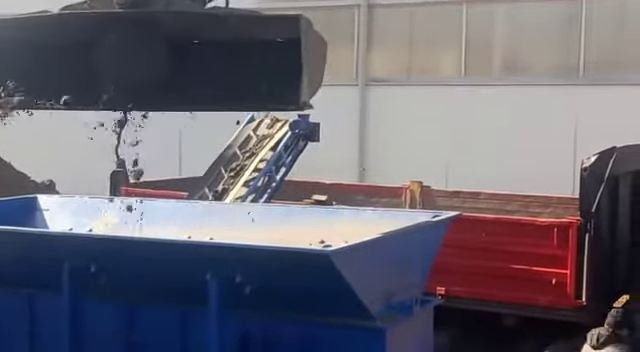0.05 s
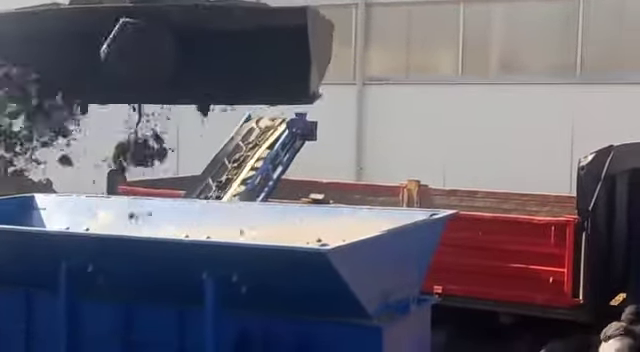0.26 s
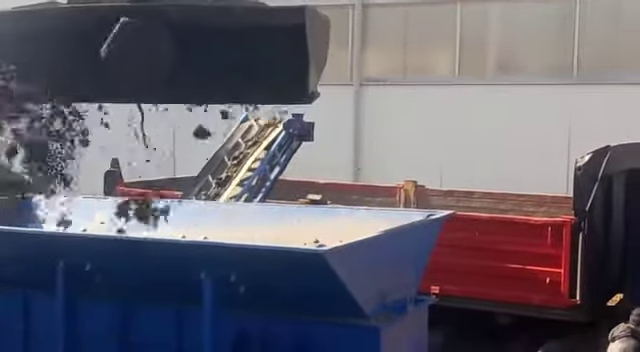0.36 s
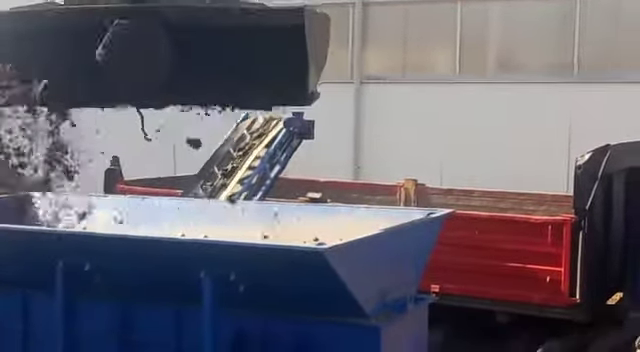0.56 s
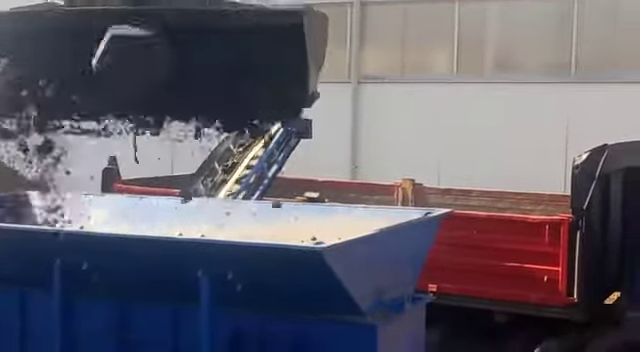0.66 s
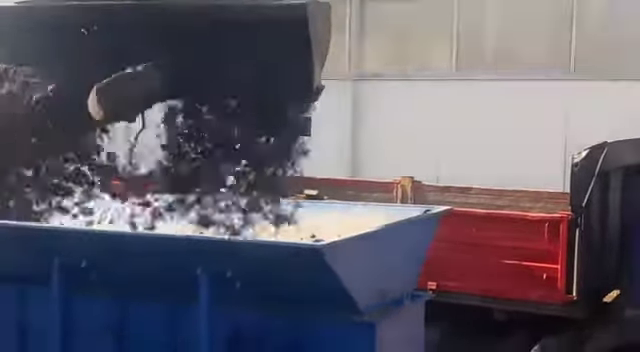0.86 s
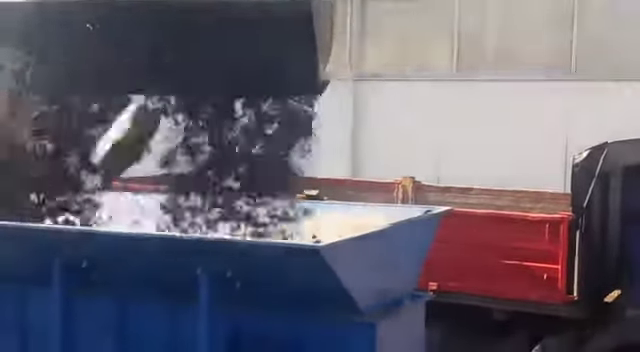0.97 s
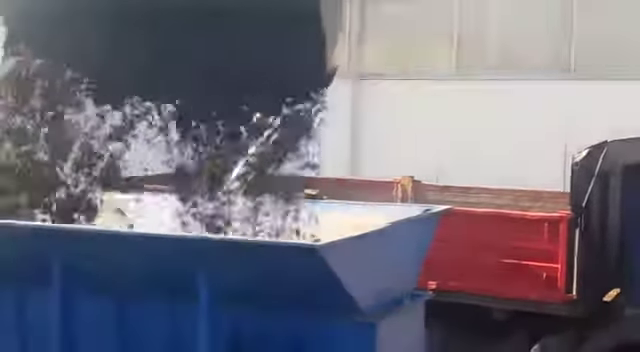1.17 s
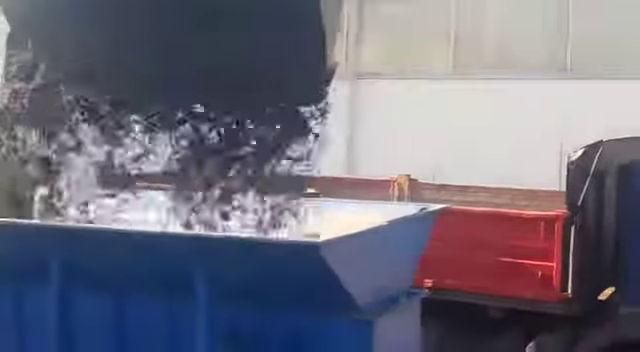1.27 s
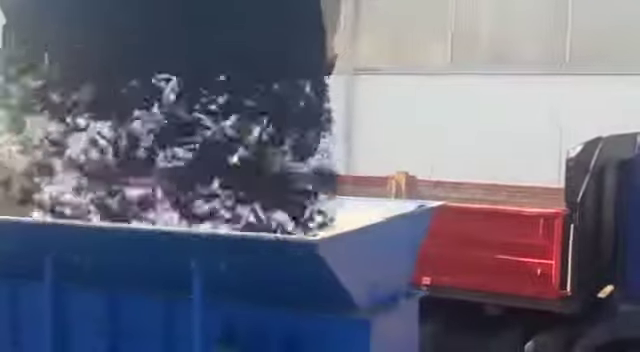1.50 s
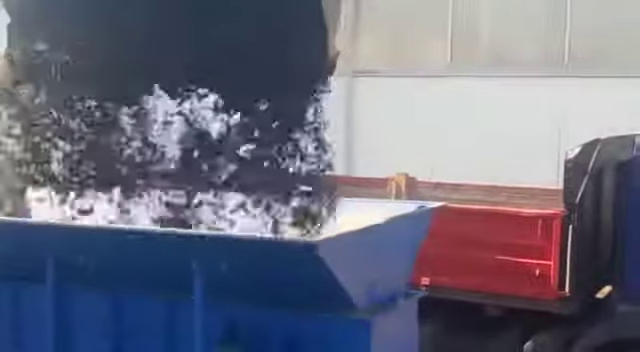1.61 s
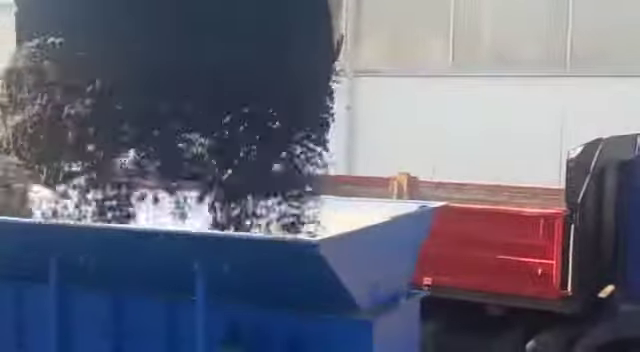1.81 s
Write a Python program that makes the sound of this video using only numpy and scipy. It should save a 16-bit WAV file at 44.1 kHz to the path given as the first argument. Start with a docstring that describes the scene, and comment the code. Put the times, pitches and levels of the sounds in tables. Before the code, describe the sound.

Rubble clatters into a metal hopper, then soil lands with a rumble as machines run.

```python
"""A work yard, one microphone near a steel hopper, a loader's diesel and other machines behind it.
The loader tips its bucket: first stones clank on the bare walls, with trickling soil and gravel.
From about 0.5 s clods burst into grit, and something heavy groans down a wall.
Around 1.2 s the bulk of the soil lands with a drumming rumble and smothers the ringing
left by grit and gravel. Fine soil slides after it, and the machines run on."""
import sys
import numpy as np
from scipy import signal
from scipy.fft import rfft, irfft, next_fast_len
from scipy.io import wavfile
from scipy.ndimage import uniform_filter1d, map_coordinates

SR = 44100
rng = np.random.default_rng(int(sys.argv[2]) if len(sys.argv) > 2 else 0)


def wrap_up_sound(samples):
    """Save the sound to the file named by the first command line argument, as 16-bit audio."""
    columns = np.atleast_2d(samples).T
    # keep every value between -1 and 1, then stretch to whole-number steps
    tamed = np.clip(columns, -1, 1)
    steps = np.round(tamed * 32767).astype(np.int16)
    wavfile.write(sys.argv[1], SR, steps)


N = 81585
GRAINS_PER_S = 3000


def stones():
    """Each stone gives a short clack and a bright edge, and the steel walls ring on."""
    # stones on steel: t/s, ring level/dB, clack level/dB, clack f/Hz, edge re ring/dB
    hits = [(.1995, -32, -18.5, 2530, -43), (0.205, -27, -8.5, 2060, -38), (0.4046, -26, -10.5, 2640, -25),
            (0.4576, -23.5, -10.5, 2020, -21.5), (0.464, -31.5, -12, 1890, -13),
            (0.501, -29.5, -22, 2360, -12), (.526, -27.5, -22, 1900, -31.5),
            (0.5981, -30, -17, 1650, -28.5), (0.6207, -25, -12.5, 2090, -32), (0.6481, -35, -17, 1940, -30),
            (0.7277, -28, -30, 2180, -15), (0.8035, -21, -14, 2510, -34.5), (0.8113, -28, -9.5, 2673, -9),
            (0.837, -43, -11, 1880, -9.5), (0.879, -25, -12, 2240, -23), (0.9004, -24.5, -11, 1990, -10.5),
            (0.916, -36.5, -14, 2495, -5), (0.9451, -24, -14, 2040, -16.5),
            (1.0444, -31.5, -15.5, 2034, -19), (1.0611, -25, -8.5, 2016, -21),
            (1.099, -29, -21, 1440, -31.5), (1.1491, -20, -3.5, 2614, 2.5), (1.2136, -34, -7, 2020, 4.5),
            (1.2558, -22.5, -10.5, 2570, -4), (1.388, -37, -23, 2060, -24), (1.446, -39, -31, 1530, -23),
            (1.495, -43, -31, 2280, -25), (1.527, -42.5, -23, 2700, -3)]
    # spectra of the dense ringing and of the hard contact: f/Hz, relative level/dB
    clang_spectrum = [(300, -37), (900, -12.5), (1200, -22.5), (1350, -9), (1530, -6.5), (1750, -3.5),
                      (1950, 8), (2150, -2.5), (2380, -9), (2660, 2.5), (3000, -11.5), (4200, -15),
                      (7000, -56.5)]
    edge_spectrum = [(1500, -30), (2800, 0.5), (4200, -11), (5700, -2.5), (6600, -11.5), (8000, -12)]
    out, t = np.zeros(N), clock()
    for start, db, clack_db, hz, edge_db in hits:
        ring = tinted(noise(clang_spectrum)) * fade(t, t60=0.15)
        add(ring, 0, amp(-3) * wall_modes())
        ring *= rise(t, tau=0.0028)
        edge = amp(edge_db) * tinted(noise(edge_spectrum)) * fade(t, t60=0.16) * rise(t, tau=0.0015)
        clack = np.sin(2 * np.pi * hz * t) * fade(t, t60=0.016) * rise(t, tau=0.0013)
        add(out, start, amp(db) * (ring + edge) + amp(clack_db) * clack)
    return out


def wall_modes():
    """The wall rings after one contact, struck a little differently each time."""
    # clearest modes of the steel: f/Hz, relative level/dB, t60/s
    modes = [(606, -23, 0.46), (770, -20.5, 0.12), (1051, -23, 0.11), (1322, -11, 0.18), (1568, -6.5, 0.2),
             (1633, -7, 0.067), (1987, -5.5, 0.034), (1950, -5.5, 0.25), (2063, -5, 0.078),
             (2120, -2, 0.19), (2680, -11, 0.18), (3130, -15.5, 0.23), (3550, -18.5, 0.15),
             (4196, -21.5, 0.087)]
    t = clock()[:SR // 2]
    return sum(amp(db + rng.normal(0, 0.36)) * fade(t, t60) * np.sin(2 * np.pi * (hz * t + rng.random()))
               for hz, db, t60 in modes)


def on_steel(contacts, ring_db):
    """Contacts with the ringing they leave in the walls, which the growing heap smothers."""
    # damping by the heap: t/s, gain/dB
    cover = [(1.25, 0.5), (1.45, -20.5)]
    ringing = unit(signal.fftconvolve(contacts, wall_modes())[:N])
    return unit(unit(contacts) + amp(ring_db) * level(cover) * ringing)


def soil():
    """Soft lumps drum the side panels, the bulk thuds on the bottom, fines hiss out after it."""
    # flow of lumps, bulk and fines: t/s, level/dB
    lump_flow = [(.36, -50.5), (.45, -40), (.49, -41), (.54, -44), (.585, -41.5), (.69, -50.5),
                 (.77, -33.5), (.84, -39), (.95, -36.5), (1.03, -40.5), (1.15, -43), (1.195, -23),
                 (1.3, -24.5), (1.41, -26.5), (1.47, -26.5), (1.53, -45), (1.85, -49)]
    bulk_flow = [(.75, -51), (.92, -39.5), (1.05, -35), (1.15, -50), (1.19, -28), (1.26, -25), (1.285, -19),
                 (1.35, -20), (1.43, -22), (1.515, -20.5), (1.56, -33.5), (1.68, -42), (1.8, -42)]
    fine_flow = [(1.2, -62.5), (1.3, -33.5), (1.37, -40), (1.47, -33), (1.53, -42), (1.57, -54),
                 (1.64, -50), (1.72, -58)]
    # hopper resonances: f/Hz, width/Hz, relative level/dB
    panel_modes = [(487, 100, -8.5), (623.4, 67, 0), (706.5, 34, 0.5), (785, 39, -3.5)]
    bottom_modes = [(90, 23, -4), (159.4, 7.6, 1), (186.5, 33, -7.5), (259, 70.4, 2.5), (288.3, 68, 1.5),
                    (371, 44, -3), (442, 206, -16.5)]
    # hiss of sliding fines: f/Hz, relative level/dB
    fine_spectrum = [(1100, -1.5), (1500, 3), (1800, -6), (2300, 4.5), (2750, -2), (3100, -20), (4200, -7),
                     (5200, -10), (5900, -3), (6600, -1.5), (7300, -18)]
    panels = resonate(shower(per_s=800, spread_db=3.5), panel_modes)
    panels = unit(colour(panels, [(200, -19), (500, -2.5), (1000, -6), (2000, -6)]))
    bottom = resonate(shower(per_s=410, spread_db=2), bottom_modes)
    bottom = unit(colour(bottom, [(30, 1.5), (80, -5), (500, -5.5), (1200, 1), (3000, -40.5)]))
    fines = tinted(colour(shower(GRAINS_PER_S, spread_db=8.5), fine_spectrum))
    return level(lump_flow) * panels + level(bulk_flow) * bottom + level(fine_flow) * patchy(fines)


def clods():
    """Each clod bursts into a spray of grit that thins out."""
    # bursting clods: t/s, level/dB, rise/s, t60/s
    bursts = [(0.476, -28.5, 0.014, 0.12), (0.713, -27, .006, 0.27), (0.811, -27.5, 0.0068, .2),
              (0.904, -27.5, 0.0046, 0.49), (1.075, -27, 0.0065, 0.1), (1.15, -27, 0.0033, 0.66),
              (1.26, -27.5, .03, 0.33), (1.77, -40, .01, 0.24)]
    # grit on steel: f/Hz, relative level/dB
    spectrum = [(800, -27.5), (2000, 9), (2700, 1), (3700, 3), (5900, -3.5), (6600, -4), (8000, -23)]
    out = np.zeros(N)
    for start, db, tau, t60 in bursts:
        age = np.maximum(clock() - start, 0)
        grit = tinted(colour(shower(GRAINS_PER_S, spread_db=4), spectrum))
        out += amp(db) * on_steel(grit, ring_db=-9) * rise(age, tau) * fade(age, t60)
    return out


def gravel():
    """Many small contacts patter, each smeared by echoes between the walls."""
    # flow of gravel: t/s, level/dB
    flow = [(.32, -53.5), (.39, -35.5), (.45, -29.5), (.485, -26), (.57, -39.5), (.655, -34.5),
            (.705, -40.5), (.79, -35), (.82, -26.5), (.86, -28), (.915, -26), (1.01, -30.5), (1.115, -32),
            (1.14, -49), (1.19, -26.5), (1.28, -26), (1.35, -48.5), (1.5, -44), (1.85, -51.5)]
    # its patter: f/Hz, relative level/dB
    spectrum = [(600, -22.5), (1000, -5), (1180, -7.5), (1340, 1), (1570, 1), (1720, -6), (2060, -2),
                (2360, -9.5), (2620, -8), (2880, -21.5), (3160, -9.5), (3500, -20), (6100, -30),
                (7500, -57.5)]
    echo = rng.standard_normal(SR // 4) * fade(clock()[:SR // 4], t60=0.08)
    echo[0] += 14  # direct sound
    contacts = signal.fftconvolve(shower(per_s=700, spread_db=6), echo)[:N]
    return level(flow) * on_steel(patchy(colour(contacts, spectrum)), ring_db=-10)


def scrape():
    """Something heavy scrapes down a wall, and the sheet gives a hollow groan."""
    # course of the groan: t/s, f/Hz, level/dB
    groan = [(0.708, 665.4, -45), (0.777, 614, -32.5), (0.791, 758.3, -47), (0.81, 794, -28.5),
             (0.84, 878, -30), (0.872, 912, -35), (.895, 854.4, -30.5), (0.919, 756.4, -26.5),
             (0.963, 807, -29), (0.994, 793, -32.5), (1.013, 960, -36.5), (1.06, 930, -56)]
    times, hz, db = np.transpose(groan)
    gain = amp(np.interp(clock(), times, db, left=-120, right=-120))
    return gain * rough_tone(np.interp(clock(), times, hz), rough=0.55, flutter_per_s=130)


def booms():
    """Each heavy lump sets one panel booming."""
    # panel booms: t/s, level/dB, f/Hz, length/s
    hits = [(.365, -36.5, 396.5, 0.063), (.46, -31.5, 1038, 0.06), (.46, -34, 639, 0.058),
            (.555, -39, 781, 0.069), (0.614, -29, 207.7, 0.11), (0.607, -37.5, 267.3, 0.11),
            (.885, -29, 623.5, 0.079), (.955, -36, 368.5, 0.036), (1.165, -29.5, 790, 0.047),
            (1.169, -24, 155, 0.045), (1.265, -24.5, 284, 0.061), (1.3, -18, 149, 0.088),
            (1.37, -21.5, 311.4, 0.11), (1.435, -25.5, 491, 0.042), (1.47, -23, 154, 0.074),
            (1.477, -26, 266.5, 0.045)]
    out = np.zeros(N)
    for start, db, hz, length in hits:
        swell = np.sin(np.pi * np.minimum(clock() / length, 1))
        add(out, start, amp(db) * swell * rough_tone(hz, rough=0.5, flutter_per_s=85))
    return out


def trickle():
    """Grains of dry soil hiss down ahead of the load."""
    # flow of grains: t/s, level/dB
    flow = [(.2, -72), (.37, -54), (.38, -42), (.425, -39.5), (.445, -53), (.5, -44.5), (.55, -64),
            (.7, -52), (.8, -59)]
    # their hiss: f/Hz, relative level/dB
    spectrum = [(2500, -25.5), (3600, -21), (4500, 4.5), (5100, 0), (5900, 8), (6500, 1), (8000, -11.5)]
    return level(flow) * patchy(colour(shower(GRAINS_PER_S, spread_db=4.5), spectrum))


def diesel():
    """The loader's rough firing note swells and sinks."""
    # firing note: t/s, level/dB
    swells = [(0, -66), (.055, -31), (.15, -53.5), (.62, -53.5), (.68, -37), (.76, -48.5), (.85, -34),
              (1.1, -34.5), (1.31, -33), (1.39, -49.5), (1.58, -32), (1.68, -48), (1.85, -48)]
    return level(swells) * rough_tone(hz=67.6, rough=0.29, flutter_per_s=41)


def yard():
    """Farther off, other machines hum unsteadily in the wash of the yard."""
    # machine hums and the wash: f/Hz, relative level/dB
    hums = [(113.0, -45), (285.3, -47.5), (565.2, -52.5), (791.3, -52)]
    wash_spectrum = [(15, -53.5), (25, -13.5), (86, 2), (370, -3.5), (520, -9.5), (835, -9.5), (1410, -20),
                     (1790, -20), (2070, -23.5), (2690, -26.5), (4540, -28.5), (6350, -29.5), (7500, -33),
                     (9750, -70)]
    out = np.zeros(N)
    for hz, db in hums:
        gain = amp(db - 5.5 + 3.5 * wobble(9.1))
        pitch = hz * (1 + 0.0086 * wobble(14))
        out += gain * np.sqrt(2) * np.sin(phase(pitch))
    return out + amp(-38 + wobble(25)) * noise(wash_spectrum)


def tinted(x):
    """Each spot on the wall favours its own pitches."""
    depth_db, width_hz = 3.8, 150
    knots = depth_db * rng.standard_normal(int(SR / width_hz))
    return unit(filtered(x, lambda hz: amp(map_coordinates(knots, [hz / width_hz]))))


def patchy(x, depth_db=3):
    """The colour of a stream shifts from moment to moment."""
    spectra = signal.stft(x, nperseg=512)[2]
    patches = uniform_filter1d(rng.standard_normal(spectra.shape), size=3, axis=0)
    patches = unit(uniform_filter1d(patches, size=14, axis=1))
    return unit(signal.istft(spectra * amp(depth_db * patches), nperseg=512)[1][:N])


def rough_tone(hz, rough, flutter_per_s):
    """A wavering tone of rms 1 that turns into narrow noise as rough grows."""
    angle = phase(hz)
    tone = (1 + rough * wobble(flutter_per_s)) * np.sin(angle)
    return unit(tone + rough * wobble(flutter_per_s) * np.cos(angle))


def shower(per_s, spread_db):
    """Random contacts of uneven size."""
    contacts = (rng.random(N) < per_s / SR) * np.sign(rng.standard_normal(N))
    return contacts * amp(spread_db * (2 * rng.random(N) - 1))


def resonate(x, modes):
    """x through resonances (f/Hz, width/Hz, level/dB) of alternating sign."""
    return filtered(x, lambda f: sum(
        (-1) ** k * amp(db) * 1j * f * width / (hz * hz - f * f + 1j * f * width)
        for k, (hz, width, db) in enumerate(modes)))


def noise(spectrum):
    return unit(colour(rng.standard_normal(N), spectrum))


def colour(x, points):
    """x through (f/Hz, gain/dB) points on a log axis."""
    hz, db = np.transpose(points)
    return filtered(x, lambda f: amp(np.interp(np.log(f + 1), np.log(hz + 1), db)))


def filtered(x, response):
    """x through a frequency response."""
    size = next_fast_len(N + SR // 2)
    return irfft(rfft(x, size) * response(np.fft.rfftfreq(size, 1 / SR)), size)[:N]


def wobble(per_s):
    """A smooth random curve, per_s knots a second."""
    return map_coordinates(rng.standard_normal(int(N * per_s / SR) + 4), [clock() * per_s])


def level(points):
    """Gain per sample from (t/s, level/dB) points."""
    return amp(np.interp(clock(), *np.transpose(points)))


def phase(hz):
    return 2 * np.pi * (np.cumsum(hz * np.ones(N)) / SR + rng.random())


def rise(t, tau):
    return 1 - np.exp(-t / tau)


def fade(t, t60):
    return 1000.0 ** (-t / t60)


def amp(db):
    return 10 ** (np.asarray(db) / 20)


def unit(x):
    return x / np.sqrt(np.mean(x ** 2) + 1e-20)


def clock():
    return np.arange(N) / SR


def add(out, start_s, x):
    i = round(start_s * SR)
    out[i:i + len(x)] += x[:N - i]


def scene():
    """The hopper in front, the machines behind, in mono."""
    hopper = stones() + trickle() + clods() + gravel() + scrape() + booms() + soil()
    return (hopper + diesel() + yard())[None]


def record(dry):
    """The microphone rolls off the top of the treble and keeps nothing above its band limit."""
    # microphone response: f/Hz, gain/dB
    response = [(20, -4), (6500, 3), (7100, -5.5), (7700, -12.5), (8200, -26.5)]
    top_hz = 8280
    return filtered(colour(dry[0], response), lambda hz: hz < top_hz)[None]


dry = scene()
out = record(dry)
wrap_up_sound(out)
```